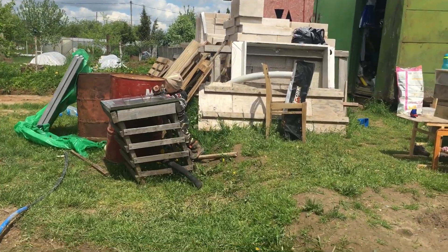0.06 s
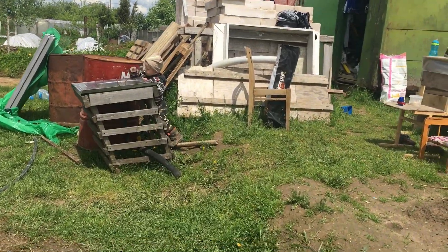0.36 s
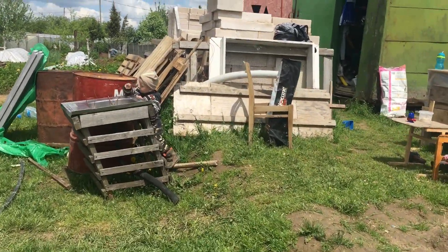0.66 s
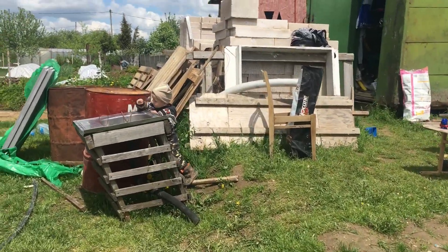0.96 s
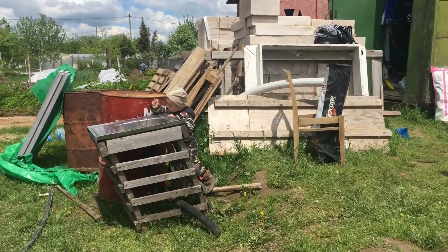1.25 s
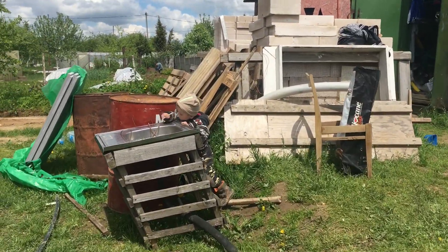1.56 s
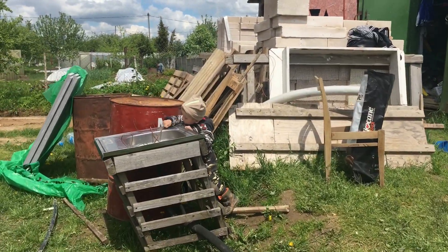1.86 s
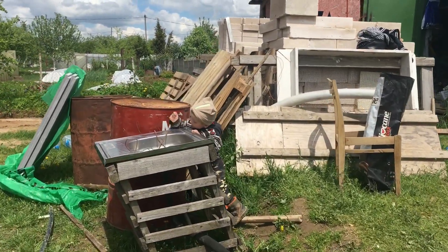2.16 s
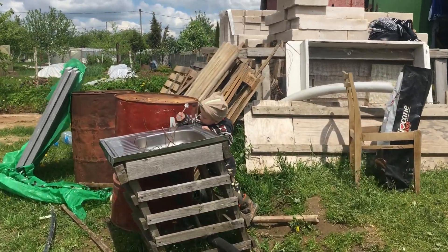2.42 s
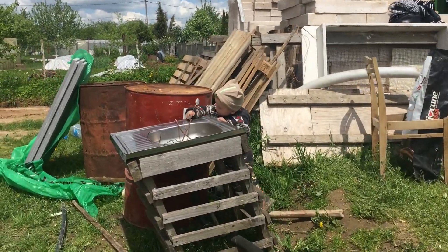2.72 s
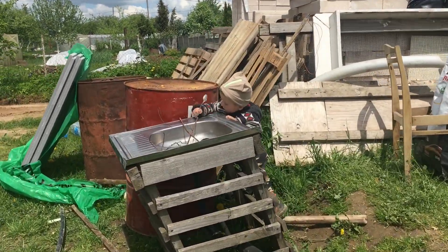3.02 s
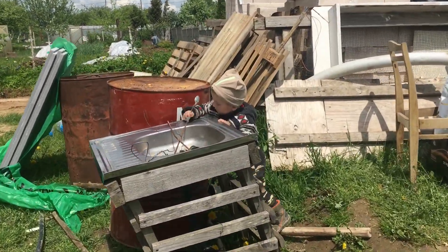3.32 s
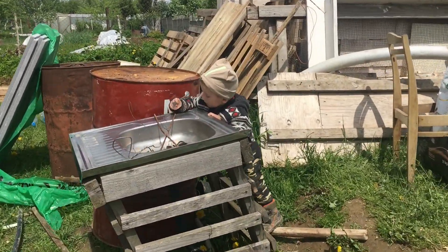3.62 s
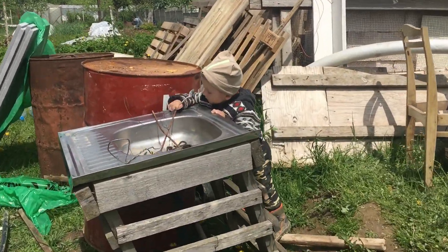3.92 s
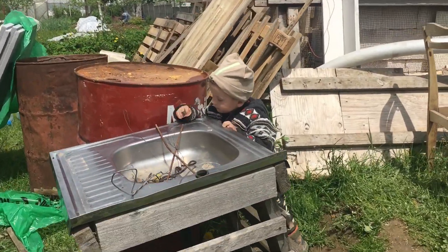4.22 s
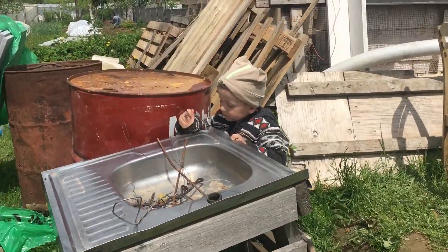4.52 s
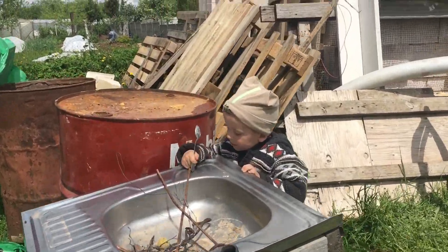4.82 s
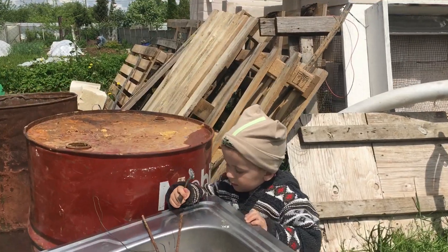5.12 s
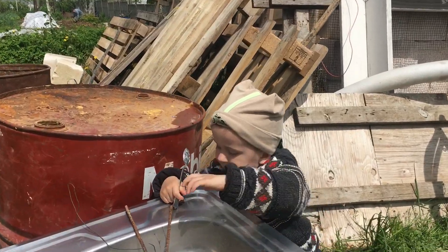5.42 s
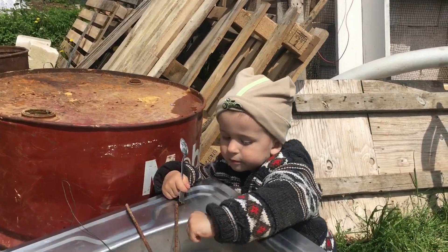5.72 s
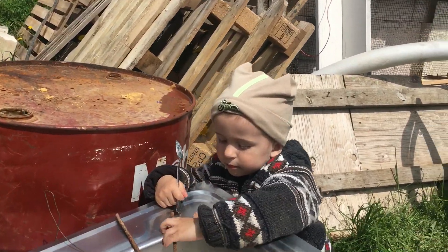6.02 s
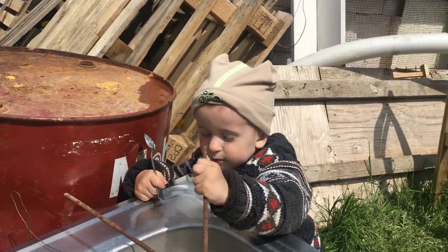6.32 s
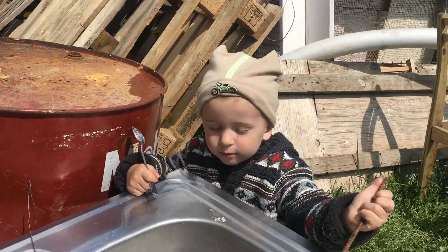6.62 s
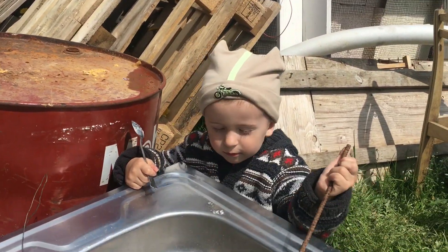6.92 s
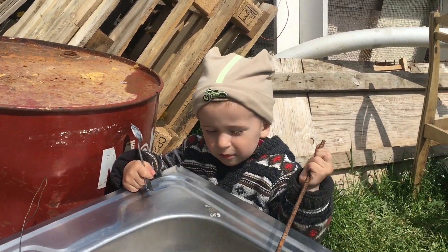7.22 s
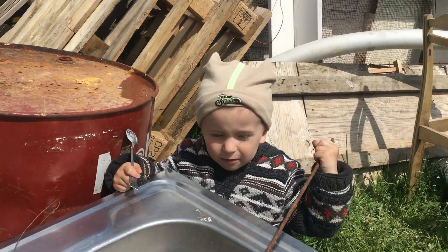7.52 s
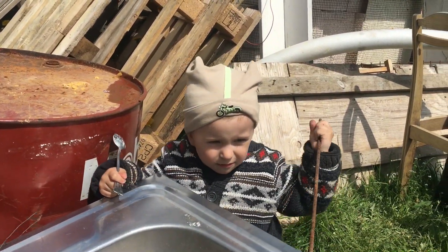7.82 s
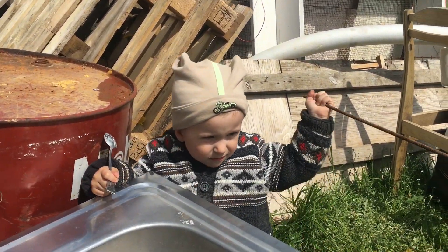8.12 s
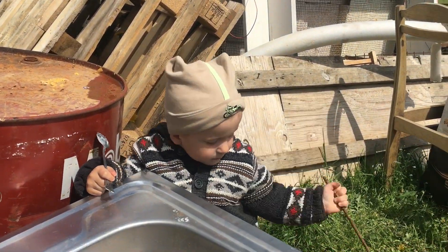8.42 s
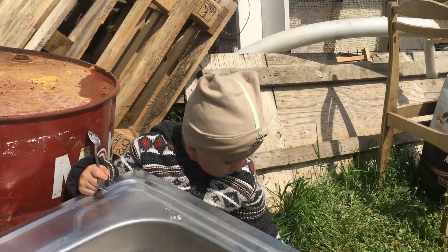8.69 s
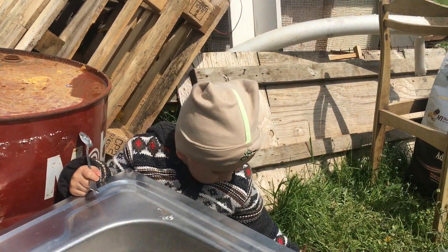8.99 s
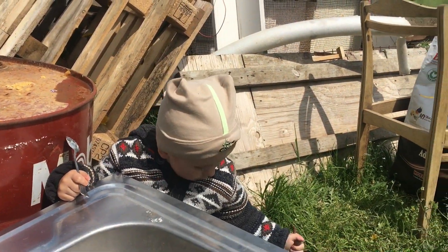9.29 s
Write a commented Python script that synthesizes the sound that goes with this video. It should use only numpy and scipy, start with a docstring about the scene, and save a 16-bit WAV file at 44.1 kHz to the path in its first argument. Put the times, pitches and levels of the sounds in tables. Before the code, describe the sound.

Outdoors, wind thumps against the microphone as irregular metallic taps and light ticks come from a steel sink, with distant birds and softly rustling leaves behind. In the second half a stick drags over the metal, catching and slipping, and lands several loud, close knocks, broken by two brief dropouts. The spoon then clinks lightly and the scraping fades under a gentle breeze.

```python
"""A windy garden, where a toddler taps the rim of a loose stainless-steel sink with a spoon and a stick.
Each hit makes the thin steel ring with many tones at once. The microphone comes closer; the stick is
dragged along the steel, catching and slipping, knocks hard and whips off the edge, and the spoon clinks.
Gusts buffet the microphone, some taps thump dully, leaves rustle and small birds sing far off.
The sound cuts out twice around the hardest knock."""
import sys
import numpy as np
from scipy import signal
from scipy.fft import rfft, irfft
from scipy.io import wavfile
from scipy.ndimage import uniform_filter1d

SR = 44100
rng = np.random.default_rng(int(sys.argv[2]) if len(sys.argv) > 2 else 0)


def generate_wav(signal):
    """Clip the signal to [-1, 1] and save it as 16-bit WAV at the path in sys.argv[1]."""
    frames = np.transpose(np.atleast_2d(signal))
    scaled = np.clip(frames, -1, 1) * 32767
    pcm = np.round(scaled).astype(np.int16)
    wavfile.write(sys.argv[1], SR, pcm)


N = 412335
BASS_HZ, MIDDLE_HZ, TREBLE_HZ, CUTOFF_HZ = 450, 1580, 9000, 16000


def from_db(db):
    """Turn decibels into a number to multiply by."""
    return 10 ** (np.asarray(db) / 20)


def rms_one(x):
    """Scale a signal so that its average size (rms) is 1."""
    return x / np.sqrt(np.mean(x ** 2) + 1e-20)


def in_time(points):
    """Join (time, value) points with straight lines, giving a value for every sample."""
    return np.interp(np.arange(N) / SR, *np.transpose(points))


def at_hz(points, hz):
    """Read between (pitch, value) points, with all octaves equally wide."""
    pitch, value = np.transpose(points)
    return np.interp(np.log(np.maximum(hz, 1)), np.log(pitch), value)


def bump(hz, centre_hz, width_hz):
    """A bell-shaped curve around one pitch, 1 at its top."""
    return 1 / (1 + (2 * (hz - centre_hz) / width_hz) ** 2)


def drift(rate):
    """A smooth random wobble, about 1 in size, that changes about rate times a second."""
    noise = rng.standard_normal(N // 20 + 4002)
    memory = np.exp(-40 * np.pi * rate / SR)
    slow = signal.lfilter([1], [1, -2 * memory, memory * memory], noise)[4000:]
    return np.interp(np.arange(N) / 20, np.arange(len(slow)), rms_one(slow))


def add(out, s, sound):
    """Mix a sound in, starting at s seconds."""
    start = int(np.clip(round(s * SR), 0, N))
    out[start:start + len(sound)] += sound[:N - start]


def swells(starts, lengths, levels_db, attack_s, release_s):
    """A loudness curve that rises, holds and dies away once for every event."""
    t = np.arange(0, N, 40) / SR
    early = np.maximum(starts[:, None] - t, 0)
    late = np.maximum(t - (starts + lengths)[:, None], 0)
    gains = from_db(levels_db)[:, None] * np.exp(-early / attack_s - late / release_s)
    return np.interp(np.arange(N) / SR, t, np.linalg.norm(gains, axis=0))


def low_noise(low_hz, high_hz, soften_hz, even_s, lowest_hz=41):
    """Low, lumpy noise with its slow swells evened out."""
    noise = rng.standard_normal(N)
    for order, edge_hz, kind in (2, [low_hz, high_hz], "band"), (1, soften_hz, "low"), (3, lowest_hz, "high"):
        noise = signal.sosfilt(signal.butter(order, edge_hz, kind, fs=SR, output="sos"), noise)
    return noise / np.sqrt(uniform_filter1d(noise * noise, int(even_s * SR)) + 1e-12)


def wind_and_thumps(attack_s=0.029, release_s=0.027, flutter_speedup=1.11, breeze_flutter_db=-24.5,
                    puff_db=4.0, lump_db=7.5):
    """Wind and dull thumps rumble on the microphone; strong gusts also flutter at a higher pitch."""
    # low rumbles on the microphone: gusts, and dull thumps under some taps
    # (start [s], length [s], rumble level [dB], flutter level [dB])
    rumbles = [(0.0, 0.18, -21.5, -42), (0.193, 0.12, -23, -22), (0.414, 0.075, -14.5, -19.5),
               (0.77, 0.082, -32.5, -58), (1.184, 0.073, -31, -46.5), (1.458, 0.158, -25, -39.5),
               (1.708, 0.14, -22, -22.5), (2.198, 0.032, -17, -28.5), (2.277, 0.27, -24, -21),
               (2.616, 0.038, -18, -31.5), (2.699, .11, -25, -27), (2.87, 0.19, -33.5, -44.5),
               (3.327, 0.013, -25, -40.5), (3.783, 0.11, -32.5, -59), (4.032, 0.09, -31.5, -25.5),
               (4.205, 0.11, -22.5, -36), (4.511, 0.16, -23, -36), (4.798, 0.057, -21.5, -26.5),
               (5.083, 0.27, -30, -42), (5.405, 0.37, -37.5, -53), (6.034, 0.023, -31, -50),
               (6.176, 0.038, -20.5, -38), (7.41, 0.51, -43.5, -51.5), (7.907, 0.026, -35, -49),
               (8.475, 0.029, -36.5, -57), (8.668, 0.14, -39.5, -35.5), (8.882, 0.16, -36, -48),
               (9.146, 0.031, -25.5, -45)]
    # the light breeze between them: (time [s], rumble level [dB])
    breeze_levels = [(0, -42), (1.05, -48.5), (2.1, -32.5), (3.2, -36), (3.65, -41.5), (5.0, -36.5),
                     (5.9, -45.5), (6.4, -46), (7.2, -53), (8.2, -49), (9.35, -44.5)]
    start, length, rumble_db, flutter_db = np.transpose(rumbles)
    breeze = from_db(in_time(breeze_levels))
    rumble_gain = swells(start, length, rumble_db, attack_s, release_s)
    flutter_gain = swells(start, length, flutter_db, attack_s / flutter_speedup, release_s / flutter_speedup)
    puffs = rms_one(from_db(puff_db * np.clip(drift(22), -2, 1.2)))
    rumble = puffs * low_noise(low_hz=44.44, high_hz=114.7, soften_hz=300, even_s=0.076)
    lumps = rms_one(from_db(lump_db * np.clip(drift(16), -2, 1.5)))
    flutter = lumps * low_noise(low_hz=116, high_hz=283, soften_hz=490, even_s=0.043)
    return (rumble * np.hypot(rumble_gain, breeze)
            + flutter * np.hypot(flutter_gain, breeze * from_db(breeze_flutter_db)))


def garden(rustle_db=-3.0, rustles_per_s=4):
    """Leaves and faraway sounds blend into a soft hush that swells and sinks."""
    # tone of the hush: (pitch [Hz], level [dB])
    tone = [(120, -16), (200, -16), (777, -19.5), (916, -19), (2910, -24.5), (3560, -24), (4950, -28.5),
            (5840, -28.5), (12800, -36), (16000, -39)]
    # its slow rise and fall: (time [s], level [dB])
    levels = [(0, -57.5), (1.1, -59.5), (1.8, -59.5), (2.7, -61), (3.5, -59.5), (5.0, -59.5), (6.0, -55.5),
              (9.3, -56.5)]
    hz = np.arange(N // 2 + 1) * SR / N
    hush = rms_one(irfft(rfft(rng.standard_normal(N)) * from_db(at_hz(tone, hz)), N))
    return hush * from_db(in_time(levels) + rustle_db * drift(rustles_per_s))


def birds(level_db=1.0, flutter_db=4.5, echo_db=-4.0, echo_s=0.33,
          chirp_rise=0.085, chirp_rasp=0.013, whistle_arch=0.02):
    """Birds sing sliding notes, roughened and smeared as they bounce off trees and sheds."""
    # one bird repeats a chirp: (start [s], chirps [count], spacing [s], length [s], pitch [Hz], level [dB])
    chirp_runs = [(0.019, 2, 0.11, 0.018, 5750, -53), (.022, 2, .095, 0.02, 2880, -58.5),
                  (0.311, 4, .142, 0.033, 5800, -65.5), (2.044, 6, .039, 0.011, 5720, -59)]
    # others whistle: (start [s], length [s], from [Hz], to [Hz], rasp [share of pitch], level [dB])
    whistles = [(1.109, 0.1, 3700, 4030, 0.0089, -60), (1.12, 0.085, 4950, 5260, 0.0074, -66),
                (1.39, 0.21, 3400, 3360, 0.03, -52), (2.198, 0.19, 3600, 3610, .07, -58),
                (2.854, 0.13, 3220, 3260, 0.05, -62), (3.128, 0.088, 7400, 4540, 0.04, -53.5),
                (3.24, 0.1, 3050, 4090, 0.12, -56), (3.43, 0.063, 3550, 3700, .05, -56),
                (3.616, .2, 6830, 3920, .01, -65.5), (3.765, 0.099, 4200, 4030, .04, -61),
                (4.172, 0.079, 3720, 3980, 0.01, -57.5), (5.866, 0.24, 4330, 4680, 0.057, -63)]
    # each note bends through three pitches: start, middle and end
    notes = [(s + k * step, length, [hz * (1 - chirp_rise), hz, hz], chirp_rasp, db)
             for s, count, step, length, hz, db in chirp_runs for k in range(count)]
    notes += [(s, length, [first, (first + last) / 2 * (1 + whistle_arch), last], rasp, db)
              for s, length, first, last, rasp, db in whistles]
    song, wobble = np.zeros(N), drift(300)
    for s, length, pitches, rasp, db in notes:
        progress = np.linspace(0, 1, int(length * SR))
        glide = np.polyval(np.polyfit([0, .5, 1], pitches, 2), progress)
        hz = glide * (1 + rasp * wobble[int(s * SR):][:len(progress)])
        loudness = from_db(db + level_db) * np.sqrt(np.abs(np.sin(np.pi * progress)))
        add(song, s, loudness * np.sin(2 * np.pi * np.cumsum(hz) / SR))
    song *= from_db(flutter_db * drift(70))
    t = np.arange(SR // 2) / SR
    echo = rng.standard_normal(len(t)) * from_db(-60 * t / echo_s)
    return song + from_db(echo_db) * signal.fftconvolve(song, echo / np.linalg.norm(echo))[:N]


def steel_tones(count=1100, crowding=1.5, contrast=1.22):
    """Thin steel vibrates in many ways at once; each is a tone with its own pitch, strength and fade."""
    # how strongly the steel sounds: (pitch [Hz], level [dB])
    levels = [(110, 0), (200, 1), (350, -8), (550, -12), (800, -7.5), (1300, -4.5), (2200, -4),
              (3300, -10.5), (5000, -11.5), (8000, -11.5), (11500, -19), (15500, -19)]
    # strong groups of tones in the bowl and drainer: (pitch [Hz], width [Hz], boost [dB])
    clusters = [(313, 16, 5.5), (407, 2.6, 2), (385, 2.8, 14), (550, 35, 7), (613, 22, 6.5),
                (698.3, 45, 5.5), (1260, 83, 0), (2406, 39, 7.5), (2574, 52, 2.5), (3220, 110, 5.5),
                (3414, 270, 1), (3800, 680, 3.5), (5349, 145, 1), (5920, 420, 3), (6900, 145, 0.5),
                (8770, 220, 5), (9400, 182, 4.5), (12240, 1100, 6)]
    # how long the steel rings: (pitch [Hz], time to fade by 60 dB [s])
    ring_times = [(150, 0.2), (700, 0.34), (1600, 0.28), (4000, 0.21), (9000, 0.14), (16000, 0.14)]
    place = (np.arange(count) + rng.random(count)) / count
    hz = 110 + (CUTOFF_HZ - 110) * place ** crowding
    boost_db = sum(db * bump(hz, centre, width) for centre, width, db in clusters)
    strength = from_db(at_hz(levels, hz) + contrast * boost_db) * np.sqrt(np.gradient(hz))
    strength /= np.linalg.norm(strength[(hz > 900) & (hz < 3500)])
    t = np.arange(SR // 3) / SR
    fade = from_db(-60 * t / at_hz(ring_times, hz)[:, None])
    phase = 2 * np.pi * rng.random((count, 1))
    return hz, strength, np.sin(2 * np.pi * hz[:, None] * t + phase) * fade


def tone_shares(hz):
    """How much each tone belongs to the bass, the middle and the treble."""
    return [at_hz(list(zip((BASS_HZ, MIDDLE_HZ, TREBLE_HZ), row)), hz) for row in np.eye(3)]


def contact_spots(strength, count, spread_db=4.0, ripple_db=3.5, neighbours=9):
    """Each spot on the steel wakes its own random mix of tones, favouring some groups of neighbours."""
    direction, spread, groups = rng.standard_normal((count, 3, len(strength))).swapaxes(0, 1)
    ripple = rms_one(uniform_filter1d(groups, neighbours, axis=1))
    return strength * np.sign(direction) * rms_one(from_db(spread_db * spread + ripple_db * ripple))


def blows(hz, strength, tones, level_db=3.5, crack=0.27, treble_crack=1.05, crack_s=0.0042,
          rise_s=0.00069, clank_db=7.5, clank_width=0.26):
    """A blow cracks brightly, clanks at the pitch of its spot and rings, muffled by what rests there."""
    # blows on the sink: (time [s], level [dB], extra bass [dB], extra treble [dB],
    # muffling [dB per s], clank pitch [Hz])
    hits = [(0.16, -20.5, 5.5, -7.5, 36, 1260), (0.5158, -34.5, 12, -4, 45, 1250),
            (0.8279, -23.5, 6.5, -8.5, 28, 1080), (1.4496, -27.5, 11, 2.5, 12, 1300),
            (1.901, -22, 0.5, -8.5, 74, 2190), (2.3143, -21, -6.5, -12.5, 21, 700),
            (2.7425, -31.5, 0, -12, 9, 710), (3.067, -28, 2, -9, 59, 635),
            (3.3817, -29.5, 6, -10.5, 30, 630), (3.8474, -24.5, 5, -5.5, 58, 900),
            (3.91, -22, 3, -2.5, 94, 797), (4.3283, -20, 9, 0.5, 58, 666),
            (4.7196, -16, 0.5, -4.5, 112, 910), (5.287, -23, 5, 0.5, 66, 720),
            (5.601, -36, 18.5, -7, 62, 420), (6.025, -58.5, 23.5, 9.5, 60, 624),
            (6.2732, -26.5, 3, -11, 65, 566), (6.3522, -22, 3, 2.5, 42, 554),
            (6.4102, -43, 21, 10, 65, 1720), (6.5334, -28, 15, -3, 62, 380), (6.589, -44.5, 32, 7, 65, 560),
            (6.694, -44, -5, 11, 63, 3090), (6.765, -13.5, 7.5, -1.5, 140, 1240),
            (6.981, -12.5, 0.5, -5, 130, 950), (7.407, -31, 16.5, -5.5, 62, 560),
            (7.5084, -17, -13, -10, 65, 590), (7.5286, -10.5, 6.5, -11.5, 55, 390),
            (7.5878, -19.5, 4, -16, 63, 560), (7.6282, -30.5, 9, -11, 72, 450),
            (7.8006, -41.5, 15, 9, 58, 400), (7.882, -39.5, 2, 11.5, 50, 1830),
            (8.072, -36.5, -20, 10, 60, 1810), (8.2104, -48.5, -27, 14, 65, 1870),
            (8.3732, -45, -12, -0.5, 50, 3270), (8.6988, -42, 21.5, -15, 40, 450)]
    times, db, bass_db, treble_db, muffling, clank_hz = np.transpose(hits)[:, :, None]
    out, t = np.zeros(N), np.arange(tones.shape[1]) / SR
    bass, _, treble = tone_shares(hz)
    clank = bump(hz, clank_hz, clank_width * clank_hz)
    colour = from_db(bass_db * bass + treble_db * treble + clank_db * clank)
    mix = contact_spots(strength, count=len(hits)) * colour
    burst = np.exp(-t / crack_s)
    rings = (mix @ tones) * (1 + crack * burst) + ((mix * treble) @ tones) * treble_crack * burst
    rise = (1 - np.exp(-t / rise_s)) ** 2   # the shaking needs a moment to spread over the steel
    fade = from_db(db + level_db - muffling * t)
    for s, ring in zip(times[:, 0], rings * rise * fade):
        add(out, s, ring)
    return out


def wind_slaps(level_db=-5.0):
    """The strongest swirls of air each slap the microphone with one push and pull."""
    # swirls: (time [s], level [dB], pitch [Hz])
    swirls = [(0.371, -10.5, 154), (1.253, -14, 69.5), (1.748, -6, 310), (2.22, -9, 91), (2.474, 2, 176),
              (3.07, -9, 80), (3.33, -13.5, 164), (4.029, -8.5, 172), (4.675, -6.5, 91), (5.096, -15, 190),
              (5.133, -13, 157)]
    out, t = np.zeros(N), np.arange(-SR // 50, SR // 50) / SR
    for s, db, hz in swirls:
        phase = 2 * np.pi * hz * t
        add(out, s + t[0], -from_db(db + level_db) * phase * np.exp((1 - phase ** 2) / 2))
    return out


def spoon_ticks(hz, strength, tones, level_db=2.0, lowest_hz=2000, crack_s=0.0038, tail_db=-11, ping_db=6.5):
    """A light touch of the spoon wakes only the steel's high tones: a short ping with a faint tail."""
    # touches: (time [s], level [dB])
    touches = [(0.575, -43.5), (0.9449, -34), (1.082, -34), (1.106, -38.5), (1.2125, -33), (1.2482, -38.5),
               (1.372, -36), (1.5783, -42), (1.695, -39), (1.811, -41), (1.826, -46), (4.319, -39.5),
               (5.802, -55), (8.186, -37)]
    out, t = np.zeros(N), np.arange(tones.shape[1]) / SR
    ping = from_db(ping_db * bump(hz, centre_hz=14000, width_hz=3200))
    high = strength * ping / (1 + (lowest_hz / hz) ** 6)
    fade = np.exp(-t / crack_s) + from_db(tail_db)
    rings = contact_spots(high / np.linalg.norm(high), count=len(touches)) @ tones
    for (s, db), ring in zip(touches, rings):
        add(out, s, ring * fade * from_db(db + level_db))
    return out


def struck(hits, tones, spread_db=1.5):
    """A few clear tones ring out, duller or brighter and a little different on every hit."""
    out, t = np.zeros(N), np.arange(SR // 2) / SR
    hz, tone_db, ring_s = np.transpose(tones)[:, :, None]
    octave = np.log2(hz) - np.log2(hz).mean()
    direction = (-1) ** np.arange(len(tones))[:, None]
    rings = direction * np.sin(2 * np.pi * hz * t) * from_db(tone_db - 60 * t / ring_s)
    for s, db, brightness in hits:
        gains = from_db(db + brightness * octave + spread_db * rng.standard_normal(hz.shape))
        add(out, s, np.sum(gains * rings, axis=0))
    return out


def bowl_knocks():
    """Some knocks, light or hard, also wake the bowl's deep tones."""
    # knocks: (time [s], level [dB], brightness [dB per octave])
    knocks = [(1.452, -41, -11.5), (3.85, -32.5, -7.5), (6.765, -13.5, .5), (6.981, -14.5, -1),
              (7.007, -21.5, -4), (7.529, -25, 4)]
    # tones of the bowl: (pitch [Hz], level [dB], time to fade by 60 dB [s])
    bowl_tones = [(130.3, -1, 0.13), (314, -5, 0.17), (439.6, -4.5, 0.32), (1060, -0.5, 0.059),
                  (1257, 3, .13), (1296, -4.5, 0.39), (1682, -18.5, 0.22)]
    return struck(knocks, bowl_tones)


def stick_pressure(attack_s=0.0087, release_s=0.0084,
                   graze_start_s=7.51, graze_db=-39, graze_fade_db_per_s=12.5, graze_bass_db=10.5):
    """How hard the stick rubs in the bass, middle and treble: single strokes and a late, fading graze."""
    # strokes: (start [s], length [s], level [dB], extra bass [dB], extra treble [dB])
    strokes = [(3.877, 0.018, -24, -5, -7), (4.002, 0.022, -46.5, -7, 8.5),
               (5.436, 0.068, -55.5, 13.5, -1.5), (5.488, 0.089, -45.5, -7, 6),
               (6.058, 0.073, -61.5, 10.5, 14.5), (6.151, .055, -29, 13, -9.5),
               (6.264, 0.12, -46.5, 22, 11), (6.406, .13, -23.5, 8, 2.5), (6.567, 0.071, -24.5, 1, 6),
               (6.695, 0.06, -22, 0, 16), (6.963, 0.038, -26.5, 4.5, 10), (7.046, 0.29, -40.5, 17, -5.5),
               (7.319, 0.13, -31, 13, -6.5), (7.417, 0.039, -23.5, -6, 4.5), (7.54, .04, -22, -13, -7),
               (7.664, 0.15, -33.5, 16.5, -0.5), (7.874, .055, -31.5, -3, 10),
               (8.08, 0.031, -33.5, 7.5, 12), (8.114, .04, -54, 20.5, -7), (8.218, .025, -35.5, 2, 11.5),
               (8.467, .03, -42.5, -6, -3), (8.69, .06, -49, 17.5, -2), (8.998, .15, -59, 14.5, -10),
               (9.22, .12, -52, 9, 5)]
    start, length, db, bass_db, treble_db = np.transpose(strokes)
    since = np.arange(N) / SR - graze_start_s
    graze = (since > 0) * from_db(graze_db - graze_fade_db_per_s * np.abs(since))
    return [np.hypot(swells(start, length, db + extra_db, attack_s, release_s), graze * from_db(lift_db))
            for extra_db, lift_db in ((bass_db, graze_bass_db), (0, 0), (treble_db, 0))]


def stick_drag(hz, strength, tones, level_db=-32.0, slips_per_s=1100, spread_db=5.0, catches_per_s=25,
               catch_db=20, judder_db=4.0, judders_per_s=70, wanders_per_s=5, boom_db=5, lowest_hz=230):
    """Bark catches and slips on the steel: a shaky hail of tiny taps that wanders from spot to spot."""
    sizes = from_db(spread_db * np.minimum(rng.exponential(1, N), 4)) * rng.choice([-1, 1], N)
    chance = rng.random(N) * SR
    catches = (chance < catches_per_s) * from_db(catch_db) * np.sign(sizes)   # a knot in the wood catches
    slips = (chance < slips_per_s) * sizes
    taps = rms_one((slips + catches) * from_db(judder_db * drift(judders_per_s)))
    boom = from_db(boom_db * bump(hz, centre_hz=400, width_hz=200))   # rubbing makes the bowl boom
    spots = contact_spots(strength * boom / (1 + (lowest_hz / hz) ** 6), count=3)
    touched = np.argmax([drift(wanders_per_s) + rng.standard_normal(N) / 2 for _ in spots], axis=0)
    out = np.zeros(N)
    for share, pressure in zip(tone_shares(hz), stick_pressure()):
        force = taps * pressure * from_db(level_db)
        for k, spot in enumerate(spots):
            out += signal.oaconvolve(force * (touched == k), (spot * share) @ tones)[:N]
    return out


def spoon_clinks():
    """The spoon clinks and rings with high tones of its own."""
    # clinks: (time [s], level [dB], brightness [dB per octave])
    clinks = [(6.696, -34.5, 4.5), (7.88, -55, 0), (8.075, -42, -3), (8.212, -48, -4), (8.375, -46, 3),
              (8.473, -47.5, 2.5)]
    # tones of the spoon: (pitch [Hz], level [dB], time to fade by 60 dB [s])
    spoon_tones = [(1910, -2.5, 0.56), (3110, -0.5, 0.45), (3220, 4.5, .25), (3810, -4.5, 0.43),
                   (6330, -4.5, .22), (7667, -14.5, 0.14)]
    return struck(clinks, spoon_tones)


def scene():
    """The sink in the open air, with wind, birds and leaves, in one channel."""
    steel = steel_tones()
    sink = blows(*steel) + stick_drag(*steel) + spoon_ticks(*steel) + bowl_knocks() + spoon_clinks()
    return (sink + wind_and_thumps() + wind_slaps() + birds() + garden())[None]


def record(dry):
    """The sound cuts out twice, the loudest peaks flatten and the highest treble is removed."""
    # moments when the sound cuts out: (start [s], end [s])
    gaps = [(6.710, 6.755), (6.779, 6.980)]
    t = np.arange(N) / SR
    sound_on = 1.0 - sum((t > start) & (t < end) for start, end in gaps)
    broken = dry * np.maximum(uniform_filter1d(sound_on, 40), from_db(-70))
    flattened = broken / (1 + broken ** 4) ** (1 / 4)
    return signal.sosfilt(signal.ellip(10, .1, 80, CUTOFF_HZ, fs=SR, output="sos"), flattened)


dry = scene()
out = record(dry)
generate_wav(out)
```